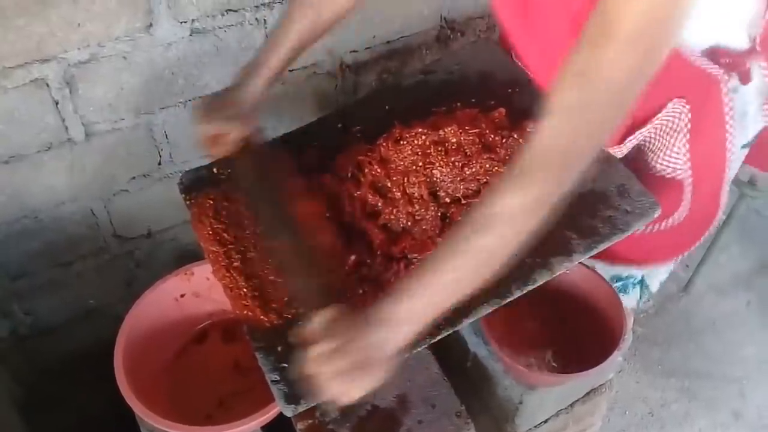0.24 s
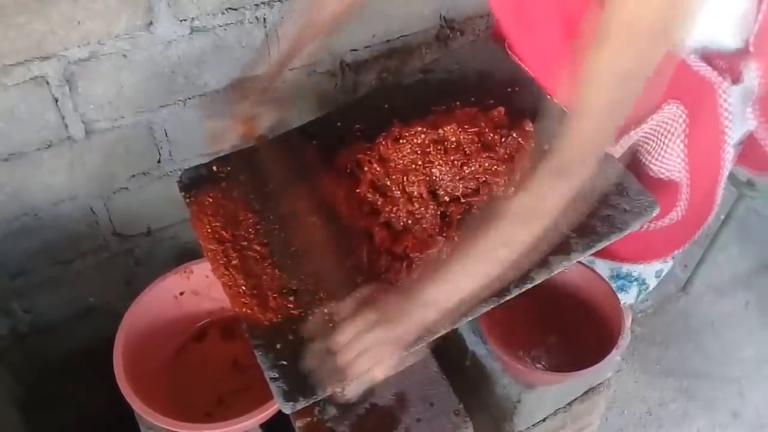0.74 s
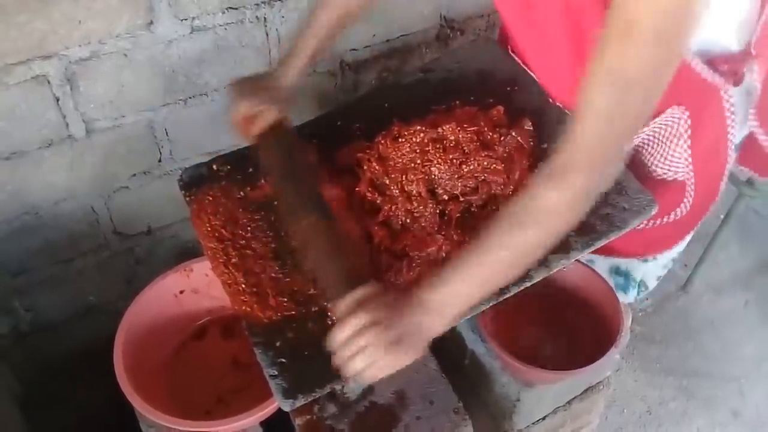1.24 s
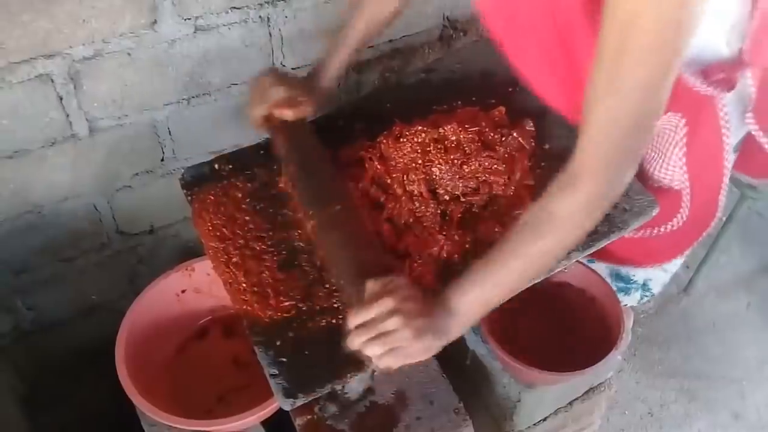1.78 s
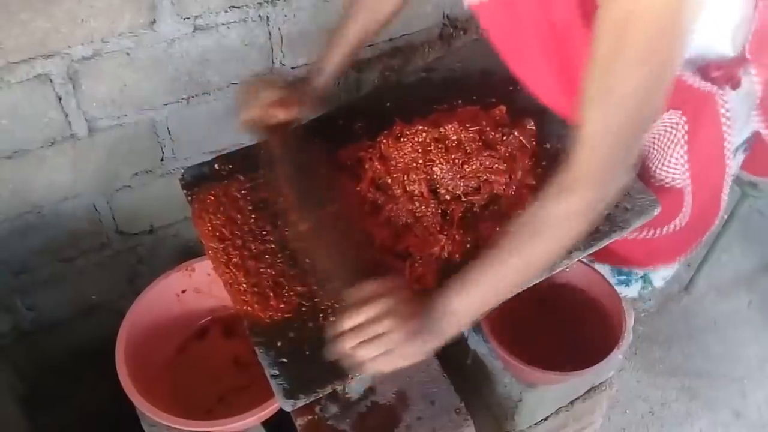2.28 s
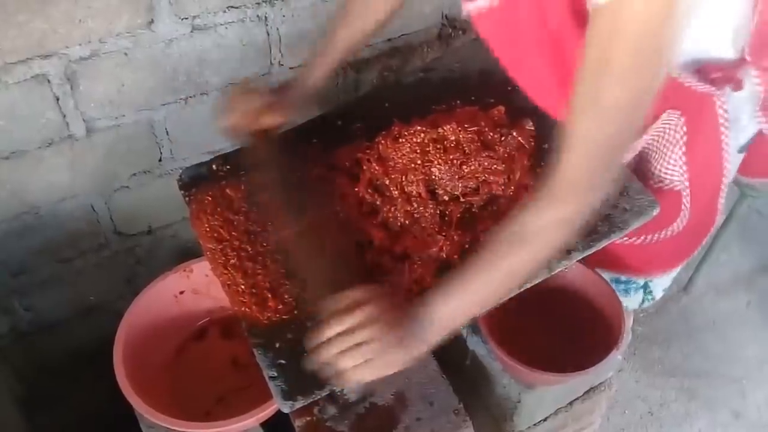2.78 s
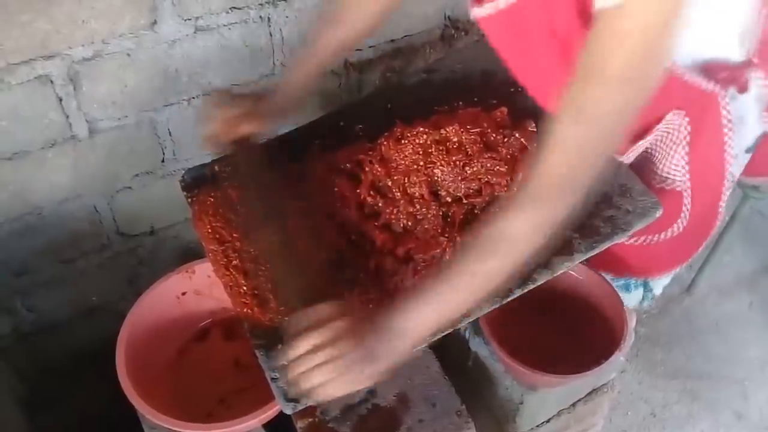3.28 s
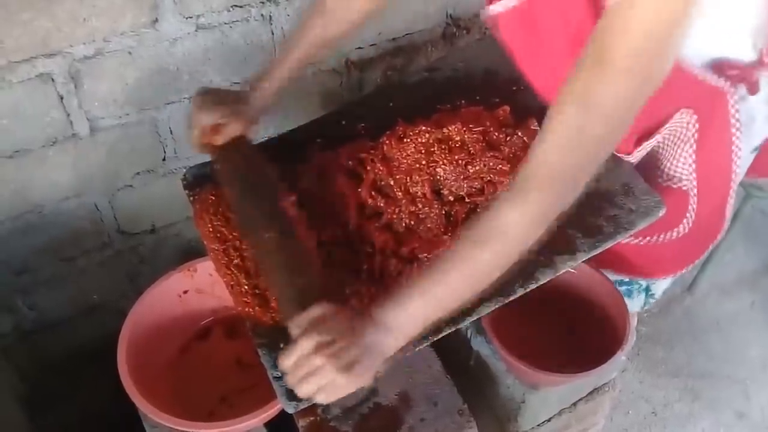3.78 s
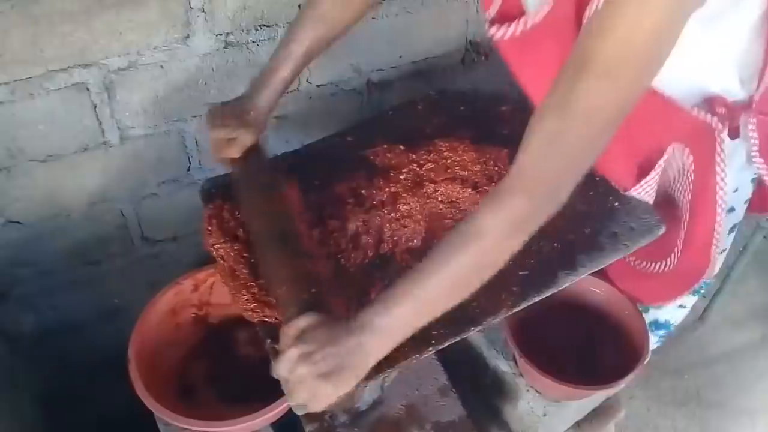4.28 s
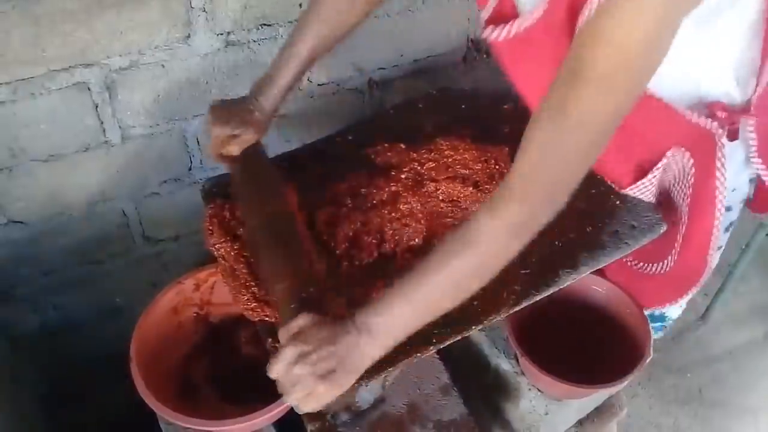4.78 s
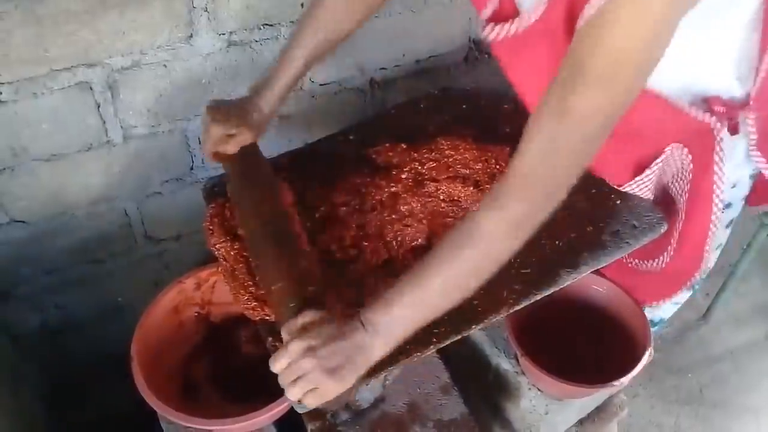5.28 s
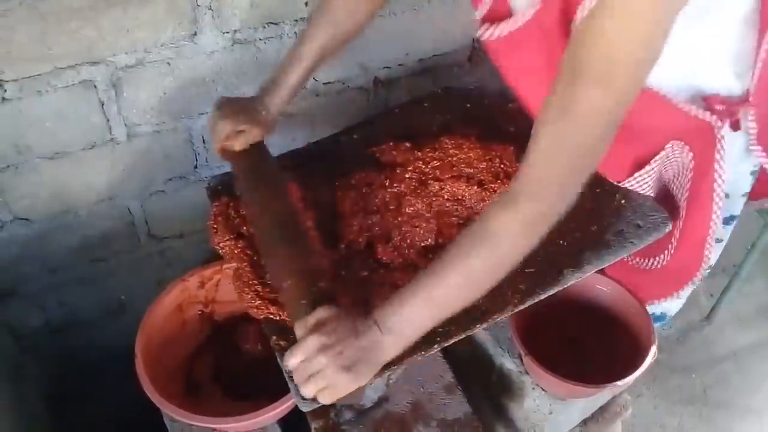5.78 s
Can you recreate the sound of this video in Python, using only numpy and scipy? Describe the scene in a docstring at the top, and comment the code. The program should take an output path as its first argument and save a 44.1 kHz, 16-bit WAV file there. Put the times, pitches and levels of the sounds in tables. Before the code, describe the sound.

From 0 s, already under way, a heavy stone roller is pushed and drawn over a pitted stone slab, about four strokes a second, without pause until the end at 6 s. Each stroke swells into low stony rumble and mid gritty rasp, with brittle crackle and a thin moist hiss, then dips as the direction turns. A strong juddering bite with a seed snap lands near 0.35 s; more dull knocks and clacks follow irregularly, with sharp snaps near 2.0 and 2.8 s. Small wet squelches slip in between 0.7 and 3.7 s. Around 4 s a low, wavering far-engine hum surfaces, and from 4.4 s the crunch turns finer while some strokes rumble harder, notably near 5.2 and 5.7 s. The hum climbs in pitch after 5.5 s. Close microphone, dull stand thumps, quiet air, very short brick-wall echoes.

```python
"""A stone roller is pushed and drawn over a stone slab, about four strokes a second, crushing dried chiles.
From the start pitted stones rumble and rasp, skins crunch, paste hisses; a brick wall close by echoes it. Soon
the roller bites through in juddering slips and seeds snap; wet pulp squelches: noise in sliding resonances.
From about four seconds a low hum, a wavering sine, swells and later climbs like a far engine; at about 4.4 s
the crunch changes colour."""
import sys
import numpy as np
from scipy import signal
from scipy.fft import rfft, irfft
from scipy.io import wavfile
from scipy.ndimage import uniform_filter1d

SR = 44100
rng = np.random.default_rng(int(sys.argv[2]) if len(sys.argv) > 2 else 0)


def unload_audio(sound):
    """Save the sound as a 16-bit wav file, at the path given as the first command line argument."""
    columns = np.transpose(np.atleast_2d(sound))
    # keep every value between -1 and 1, then stretch to whole-number steps
    steps = np.round(np.clip(columns, -1, 1) * 32767)
    wavfile.write(sys.argv[1], SR, steps.astype(np.int16))


N = 266364


def amp(db):
    """Decibels to gain."""
    return 10 ** (np.asarray(db) / 20)


def evened(x):
    """Scales to rms 1."""
    return x / np.sqrt(np.mean(x ** 2) + 1e-20)


def follow(rows, axis):
    """One column of a curve, at every sample."""
    rows = np.asarray(rows)
    return np.interp(np.arange(N) / SR, rows[:, 0], rows[:, axis])


def add(mix, s, sound):
    """Mixes a sound in at time s."""
    part = mix[max(round(s * SR), 0):][:len(sound)]
    part += sound[:len(part)]


def through(x, response):
    """Passes x through a response scaled to unit energy."""
    return signal.oaconvolve(x, response / np.linalg.norm(response))[:len(x)]


def colour(points, size=4096):
    """The causal, minimum-phase response that has a given spectrum."""
    hz, db = np.transpose(points)
    bin_hz = abs(np.fft.fftfreq(size, 1 / SR))
    bin_db = np.interp(np.log(bin_hz + 1), np.log(hz), db)
    log_gain = np.log(amp(bin_db))
    spectrum = np.exp(np.conj(signal.hilbert(log_gain)))
    return np.fft.ifft(spectrum).real[:size // 2]


def ring(modes, damping=1, size=8192):
    """The response of a body: one dying tone a mode, dying faster the wider the mode."""
    t = np.arange(size) / SR
    response = np.zeros(size)
    for hz, width, db in modes:
        decay = np.exp(-np.pi * width * damping * t)
        response += amp(db) * width * decay * np.cos(2 * np.pi * hz * t)
    return response


def grains(per_s, spread_db):
    """Random tiny impacts of either sign and exponentially spread level in dB, rms 1."""
    size = amp(spread_db * np.minimum(rng.exponential(1, N), 4))
    struck = rng.random(N) < per_s / SR
    return evened(size * rng.choice([-1, 1], N) * struck)


def wobble(hz, size=64):
    """Smooth chance up to about a given rate, rms 1, drawn every few samples."""
    count = N // size + 2
    rate_hz = np.fft.rfftfreq(count, size / SR)
    slow = irfft(rfft(rng.standard_normal(count)) * np.exp(-(rate_hz / hz) ** 2), count)
    return evened(np.interp(np.arange(N) / size, np.arange(count), slow))


# The spectral shape of still air. Each row: frequency in Hz, relative level in dB per Hz.
AIR_COLOUR = [(15, -13), (30, -13), (50, -5.5), (72, -3), (130, -2.5), (380, -9.5), (600, -13.5),
              (1100, -26), (2400, -17.5), (3400, -26.5), (5200, -29), (7000, -40), (15000, -42)]
AIR_DB = -47.5  # rms


def air():
    """Still air is a steady coloured noise."""
    return amp(AIR_DB) * through(rng.standard_normal(N), colour(AIR_COLOUR))


# The far engine before it wavers. Each row: time in seconds, pitch in Hz, level in dB.
ENGINE_CURVE = [(0, 74.2, -67), (3.6, 76.4, -57), (3.95, 73, -45), (4.25, 77.6, -65), (4.72, 78.3, -40),
                (5.05, 81.2, -53), (5.27, 76.4, -44.5), (5.6, 90.7, -46), (5.75, 104.3, -44),
                (5.9, 104.2, -35), (6.04, 105, -41)]


def engine():
    """A far engine hums as one sine whose pitch and level drift and waver."""
    pitch_hz = follow(ENGINE_CURVE, axis=1) * (1 + 0.023 * wobble(hz=10.6))
    turns = np.cumsum(pitch_hz) / SR
    level_db = follow(ENGINE_CURVE, axis=2) + 3.3 * wobble(hz=11.0)
    return amp(level_db) * np.sqrt(2) * np.sin(2 * np.pi * turns)


def walls(x, t60=0.17, wet_db=-11):
    """A short scatter of echoes from the brick wall and floor, dying by 60 dB in t60 seconds."""
    t = np.arange(SR // 3) / SR
    struck = (rng.random(len(t)) < 2500 / SR) * (t > .004)  # 2500 echoes a second, none in the first 4 ms
    taps = rng.standard_normal(len(t)) * struck
    return x + amp(wet_db) * through(x, taps * np.exp(-np.log(1000) * t / t60))


def stand(level):
    """The stand booms dully at one mode under the shoves, and the floor rumbles beneath it."""
    boom = ring([(133.0, 20.3, 0)])
    shoves = grains(per_s=600, spread_db=1.5)
    booming = evened(through(through(shoves, boom), boom))  # twice round the same mode, for a softer onset
    floor_colour = colour([(20, -26), (60, -3.5), (100, 2), (160, -17), (400, -47)])  # (Hz, dB per Hz)
    floor = through(rng.standard_normal(N), floor_colour)
    return amp(-3.5) * level * booming + amp(-29.0) * np.sqrt(level) * floor


# The spectral shape of the hiss. Each row: frequency in Hz, relative level in dB per Hz.
HISS_COLOUR = [(2000, 0.5), (6000, 1.5), (7500, -1.5), (9500, -1), (11500, -1.5), (13700, 0.5), (15000, -2),
               (16000, -20)]


def paste(level):
    """Moist paste smears under the roller with a fine fizz, now duller, now brighter."""
    fizz = through(level * grains(per_s=6000, spread_db=3.0), colour(HISS_COLOUR))
    high_pass = signal.butter(3, 10500, "high", fs=SR, output="sos")
    top = signal.sosfiltfilt(high_pass, fizz)
    tilt = amp(1.7 * wobble(hz=25))
    return amp(1) * (top * tilt + (fizz - top) / tilt)


# Wet pulp squeezes out as the roller turns. Each row: start in seconds, length in seconds (at least 0.01
# is played), starting pitch in Hz, final pitch in Hz, rms level in dB before the fade in and out.
SQUELCH_EVENTS = [(0.693, 0.048, 2200, 2480, -56), (1.598, 0.098, 1810, 2400, -44.5),
                  (1.633, 0.058, 2700, 3320, -48), (2.266, 0.11, 2300, 3020, -50),
                  (2.97, 0.076, 2460, 3050, -44.5), (3.178, 0.051, 3060, 2540, -43.5),
                  (3.618, 0.065, 3400, 2700, -41.5), (3.661, 0.016, 1910, 1810, -39)]


def squelches(width_hz=650):
    """Tiny bubbles burst in a pocket of pulp, a resonance that slides as the pocket changes size."""
    out = np.zeros(N)
    r = np.exp(-np.pi * width_hz / SR)
    for s, length, first_hz, last_hz, db in SQUELCH_EVENTS:
        size = int(max(length, .01) * SR)
        pitch_hz = np.geomspace(first_hz, last_hz, size)
        turn = np.exp(2j * np.pi * np.cumsum(pitch_hz) / SR)
        bubbles = rng.standard_normal(size) * (rng.random(size) < 600 / SR)
        # shift down by the sliding pitch, smooth, then shift back up
        smoothed = signal.lfilter([1], np.poly([r, r]), bubbles / turn)
        pocket = (turn * smoothed).real
        add(out, s, amp(db) * evened(pocket) * np.sin(np.linspace(0, np.pi, size)))
    return out


# Seeds and flakes snap. Each row: start in seconds, peak level in dB, pitch in Hz.
SNAP_EVENTS = [(0.3386, -24, 5030), (0.963, -33, 4200), (1.1817, -31, 4800), (1.548, -24.5, 4800),
               (2.0127, -19, 4430), (2.818, -17.5, 4070), (2.8848, -24, 4450), (2.9003, -27, 4460),
               (3.618, -26, 5000), (3.6254, -22, 4460), (4.0578, -24, 4770), (4.1668, -22.5, 4070),
               (4.2377, -24, 4200), (4.3317, -31, 4410), (4.3824, -24.5, 4630), (5.0381, -27, 4560),
               (5.0676, -28.5, 4610), (5.2383, -28, 4880), (5.4211, -28.5, 4500)]


def snaps(size=1400):
    """A seed gives way: a short ping, a tick through its shell and a few crumbs of noise."""
    out = np.zeros(N)
    t = np.arange(size) / SR
    for s, db, hz in SNAP_EVENTS:
        ping = t * np.exp(-t / .0005) * np.sin(2 * np.pi * hz * t)
        fading = np.exp(-(t / 0.0029) ** 2) + 0.14 * np.exp(-t / 0.017)
        fracture = rng.standard_normal(size) * fading
        shell = signal.butter(3, [.88 * hz, 1.3 * hz], "band", fs=SR, output="sos")
        tick = evened(signal.sosfilt(shell, fracture))
        snap = evened(ping) + tick + amp(-15) * evened(fracture)
        add(out, s, amp(db) * snap / abs(snap).max())
    return out


# Spectral shapes of the crunch, before and after about 4.4 s. # Each row: frequency in Hz, relative level in dB
# per Hz.
EARLY_COLOUR = [(900, -74), (2600, -4), (3400, -6), (4000, 1.5), (4600, 2.5), (5300, 3.5), (5900, -6),
                (6600, -17), (8000, -26.5), (16000, -49)]
LATE_COLOUR = [(900, -47), (2600, 6), (3400, -7.5), (4000, 4), (4600, 1.5), (5300, 3.5), (5900, 0.5),
               (6600, -3), (8000, -33), (16000, -51)]
LATE_FROM_S = 4.365


def crunch(level, count=14):
    """Skins break in tiny pings at a spread of pitches, over a bed of fine crackle."""
    t = np.arange(SR // 100) / SR
    pings = np.zeros(N)
    for hz in np.linspace(3300, 6600, count):
        ping = t * np.exp(-t / .0007) * np.sin(2 * np.pi * hz * t)
        pings += through(grains(per_s=70, spread_db=3), ping)
    crackle = grains(per_s=5000, spread_db=4)
    drive = level * evened(evened(pings) + 2.28 * crackle)
    fine = np.arange(N) / SR > LATE_FROM_S
    crunching = np.where(fine, through(drive, colour(LATE_COLOUR)), through(drive, colour(EARLY_COLOUR)))
    return amp(-5) * crunching


# Modes of the slab on its stand and of the roller, before any extra damping.
# Each row: frequency in Hz, width in Hz, relative level in dB.
SLAB_MODES = [(181, 23, -22), (204, 16, -25), (245, 58, -14), (269, 53, -6.5), (337, 11.6, -7),
              (378.2, 11.7, -1), (398, 16, -10.5), (483, 21.3, -12), (570, 21, -25), (580, 21, -20.5),
              (662, 22, -16), (790, 32, -45), (830, 110, -26), (839, 65, -19.5)]
ROLLER_MODES = [(1109, 82, 1), (1185, 84, -4), (1359, 110, -2.5), (1493, 78, 1), (1603, 67, -8),
                (1777, 164, -7.5), (1990, 210, -14.5), (2240, 280, -10.5), (2336, 260, -5), (2500, 63, -2),
                (2790, 200, -9), (3090, 250, -8.5)]
# What each stone radiates: lower edge in Hz, upper edge in Hz.
SLAB_RANGE_HZ = (170, 804)
ROLLER_RANGE_HZ = (1088, 2806)


def body(modes, band_hz, damping=1):
    """A stone rings in its modes but radiates them only within a band."""
    band = signal.butter(4, band_hz, "band", fs=SR, output="sos")
    return signal.sosfilt(band, ring(modes, damping))


def rubbed(drive, modes, band_hz, damping, wander_db):
    """As the contact travels over the stone it feeds each mode more or less."""
    out = np.zeros(N)
    for mode in modes:
        feed = evened(amp(wander_db * wobble(hz=10.0)))
        out += signal.oaconvolve(drive * feed, body([mode], band_hz, damping))[:N]
    return out / np.linalg.norm(body(modes, band_hz, damping))


# The roller bites through to bare stone and judders. Each row: start in seconds, peak level in dB,
# length in seconds, ring of the roller in dB against the thud before a 1.5 dB lift.
BITES = [(0.346, -12.5, 0.012, -16), (0.803, -21.5, 0.013, -1), (1.065, -20.5, 0.011, -12.5),
         (1.268, -16, 0.013, -10.5), (1.733, -21.5, 0.02, -10), (2.189, -19.5, 0.012, -13),
         (2.617, -20.5, 0.013, -12), (2.649, -19.5, 0.016, -10), (2.873, -14.5, 0.014, -13.5),
         (2.903, -18.5, 0.019, -14), (3.087, -18, 0.014, -18), (3.108, -15, 0.013, -20),
         (3.247, -28, 0.0089, -13), (3.333, -12, 0.012, -16.5), (3.528, -26, .014, 6),
         (3.59, -18, 0.014, -21), (3.763, -26, 0.012, 8), (4.032, -24, 0.016, -6.5), (4.236, -14, 0.01, 4),
         (4.422, -18.5, 0.018, -13.5), (4.677, -16.5, 0.01, -11), (5.201, -16.5, 0.013, -17.5),
         (5.23, -18.5, 0.018, -13), (5.462, -12.5, 0.01, -10.5), (5.721, -19.5, 0.014, -17),
         (5.979, -12, 0.012, -35)]


def knocks(size=4000):
    """A bite is a quick run of slips that rings both stones; pressed together, the slab rings only briefly."""
    out = np.zeros(N)
    t = np.arange(size) / SR
    slab = body(SLAB_MODES, SLAB_RANGE_HZ, damping=2.5)
    roller = body(ROLLER_MODES, ROLLER_RANGE_HZ)
    for s, db, length, roller_db in BITES:
        unsteady = evened(uniform_filter1d(rng.standard_normal(size), size=70))
        slip_hz = 380 * np.exp(.05 * rng.standard_normal() + .25 * unsteady)
        slips = np.diff(np.floor(np.cumsum(slip_hz) / SR), prepend=-1)  # one impulse a slip, the first at once
        slips = slips * np.exp(-(t / max(length, .002)) ** 4)
        push = evened(through(slips, slab))
        thud = evened(3.1 * push + evened(np.gradient(push)))  # a hard contact favours the upper modes
        clack = evened(through(slips * rng.uniform(0.17, 1, size), roller))
        blow = thud + amp(roller_db + 1.5) * clack
        add(out, s, amp(db) * blow / abs(blow).max())
    return out


CUSHION_DB, CUSHION_S = 5, 0.015  # softening just before a bite, and the time over which it builds


def cushion():
    """The stones ride on paste, which softens their contact, until the roller bites through."""
    t = np.arange(N) / SR
    softness = sum(np.exp(-abs(t - s) / CUSHION_S) * (t < s) for s, *_ in BITES)
    return amp(-CUSHION_DB * softness)


def stones(rumble, rasp):
    """Pits in the two stones catch on each other: the slab rumbles and the roller rasps."""
    catches = grains(per_s=1500, spread_db=3.0)
    grit = evened(0.79 * catches + grains(per_s=1200, spread_db=-1.0))
    slab = rubbed(catches * rumble, SLAB_MODES, SLAB_RANGE_HZ, damping=1.13, wander_db=3)
    roller = rubbed(grit * rasp, ROLLER_MODES, ROLLER_RANGE_HZ, damping=0.98, wander_db=4.5)
    return amp(-0.5) * slab + amp(-2.0) * roller


# Draws and pushes in turn. Each row: time of full pressure in seconds, attack, hold and release in seconds,
# then levels in dB before each layer's own trim: stone-on-stone rumble, gritty rasp, crunch of skins,
# hiss of paste, boom of the stand.
STROKE_ROWS = [(-0.09, 0.05, 0.055, 0.087, -34.5, -40.5, -40.5, -55, -46.0),
               (0.149, 0.11, 0.027, 0.085, -32.0, -34.5, -40, -52.5, -40.5),
               (0.326, 0.054, 0.021, 0.1, -26.0, -35, -34.5, -47, -33),
               (0.589, 0.069, 0.051, 0.11, -32.5, -36, -38, -51.5, -32.5),
               (0.778, 0.053, 0.034, 0.15, -30.5, -37.5, -37.5, -48.0, -36),
               (1.046, 0.056, 0.051, 0.12, -30.5, -35.0, -38.5, -52.5, -38.5),
               (1.254, 0.051, 0.025, 0.12, -32.5, -36.5, -39, -50.0, -38),
               (1.507, 0.076, 0.071, 0.065, -33.5, -35, -40, -55.5, -42.5),
               (1.712, 0.05, 0.032, 0.1, -30, -37.5, -36.5, -51.0, -38.0),
               (1.964, 0.053, 0.071, 0.15, -32.0, -37.5, -39.5, -55.0, -37.0),
               (2.168, 0.059, 0.018, 0.16, -32.0, -36.5, -38.5, -49, -38),
               (2.421, 0.061, 0.059, 0.091, -29.0, -32.5, -39.0, -54.0, -44),
               (2.594, 0.016, 0.065, 0.13, -28.5, -35.5, -41, -53.5, -43.5),
               (2.885, 0.075, 0.055, 0.15, -28.5, -32, -39, -51.0, -37.0),
               (3.064, 0.046, 0.064, 0.18, -30.5, -37, -39.0, -51.5, -45),
               (3.324, 0.039, 0.075, 0.08, -27.0, -33.5, -37.0, -53.5, -38),
               (3.52, 0.04, 0.075, 0.13, -31, -36, -38.5, -52, -41.5),
               (3.773, 0.065, 0.084, 0.074, -31.5, -33.5, -37.5, -53.0, -34),
               (3.961, 0.033, 0.07, 0.137, -29.5, -35.5, -38, -52, -39.5),
               (4.238, 0.097, 0.032, 0.1, -33, -32.5, -37.0, -51.5, -32),
               (4.392, 0.037, 0.041, 0.11, -28.5, -38.0, -41, -48, -35),
               (4.677, 0.063, 0.072, 0.071, -25.0, -32.5, -41.5, -51.0, -39),
               (4.936, 0.089, 0.019, 0.094, -29.5, -36.5, -39.5, -46.5, -33),
               (5.191, 0.029, 0.102, 0.084, -23, -32, -40, -53.5, -37),
               (5.45, 0.076, 0.047, 0.094, -31.0, -38, -39.5, -48.0, -35.0),
               (5.729, 0.067, 0.069, 0.097, -25, -30.5, -40.5, -50, -34),
               (5.96, 0.058, 0.08, 0.115, -28.5, -39, -41, -47.5, -33)]
TURN_SHARE, TURN_S = 0.83, 0.027  # the roller turns this share of an attack before full pressure; dip's spread


def effort(layer, shape):
    """A layer's gain: each stroke bears down, holds and lets go, and the sound dips as the roller turns back."""
    late_start, late_end, slope, depth_db, dip_db = shape
    t = np.arange(0, N / SR, .001)
    power, turning = 0, 0
    for s, attack, hold, release, *levels_db in STROKE_ROWS:
        start, end = s + late_start, s + hold + late_end
        rising = np.maximum(start - t, 0) / max(attack, .005)
        falling = np.maximum(t - end, 0) / max(release, .005)
        held_s = np.clip(t, start, end) - start
        power += amp(levels_db[layer] + slope * held_s - depth_db * (rising + falling)) ** 2
        turning += np.exp(-((t - s + TURN_SHARE * attack) / TURN_S) ** 2)
    return np.interp(np.arange(N) / SR, t, np.sqrt(power) * amp(-dip_db * turning))


# How each layer answers a stroke. Each holds: late start in seconds, late end in seconds,
# slope while held in dB per second, depth of attack and release in dB, dip at the turn in dB.
RUMBLE_ANSWER = (.014, .0, -24, 22, 3)
RASP_ANSWER = (0.0075, -.008, -14, 15.5, 3)
CRUNCH_ANSWER = (0.023, 0, -23, 11, 7)
HISS_ANSWER = (0.0018, 0.011, 42, 14.1, 5.6)
BOOM_ANSWER = (0.03, 0.0194, 43, 19.5, 0)
# Rms unevenness in dB: shared by all layers but the boom, quick in each, slow in each.
GRIP_DB, FLUTTER_DB, LUMPS_DB = 1.44, 1.13, .5


def scene():
    """Rumble, rasp, crunch and hiss share the roller's uneven grip, and each flutters a little on its own."""
    answers = [RUMBLE_ANSWER, RASP_ANSWER, CRUNCH_ANSWER, HISS_ANSWER, BOOM_ANSWER]
    *contacts, shove = (effort(layer, shape) for layer, shape in enumerate(answers))
    grip_db = GRIP_DB * wobble(hz=49.4)
    uneven = []
    for level in contacts:
        own_db = FLUTTER_DB * wobble(hz=70.4) + LUMPS_DB * wobble(hz=22.2)
        uneven.append(level * amp(grip_db + own_db))
    rumble, rasp, skins, hiss = uneven
    softened = cushion()
    grinding = stand(shove) + paste(hiss) + squelches() + snaps() + crunch(skins)
    grinding += knocks() + stones(rumble * softened, rasp * softened)
    return (walls(grinding) + air() + engine())[None]


EDGE_HZ = 15800


def record(dry):
    """A steep low-pass ends the treble at EDGE_HZ."""
    low_pass = signal.firwin(511, EDGE_HZ, window=("kaiser", 9), fs=SR)
    return signal.oaconvolve(dry, low_pass[None], "same")


dry = scene()
out = record(dry)
unload_audio(out)
```